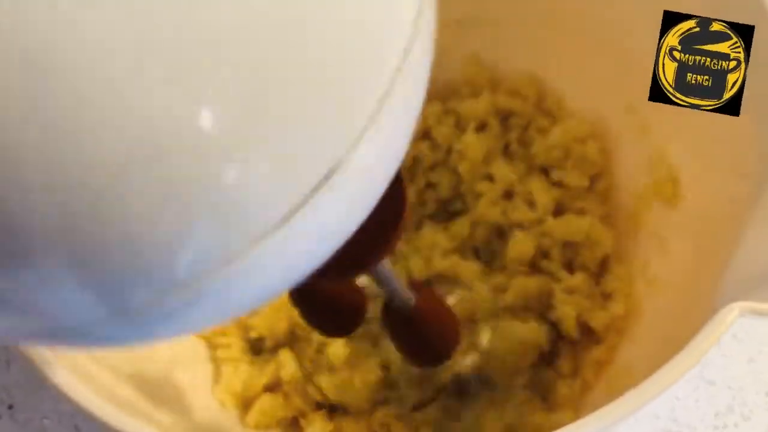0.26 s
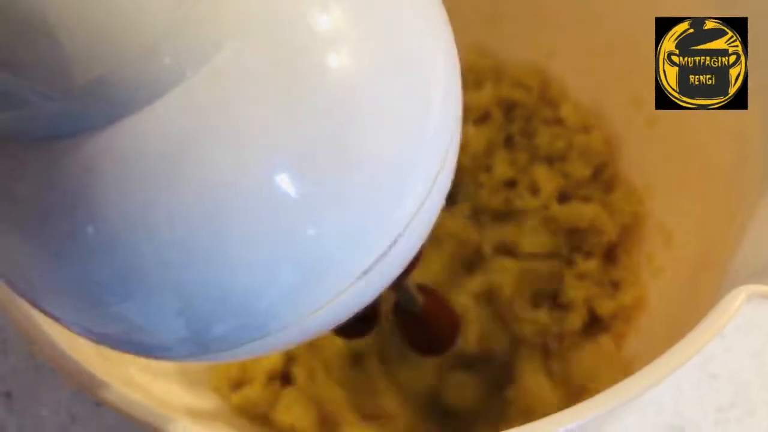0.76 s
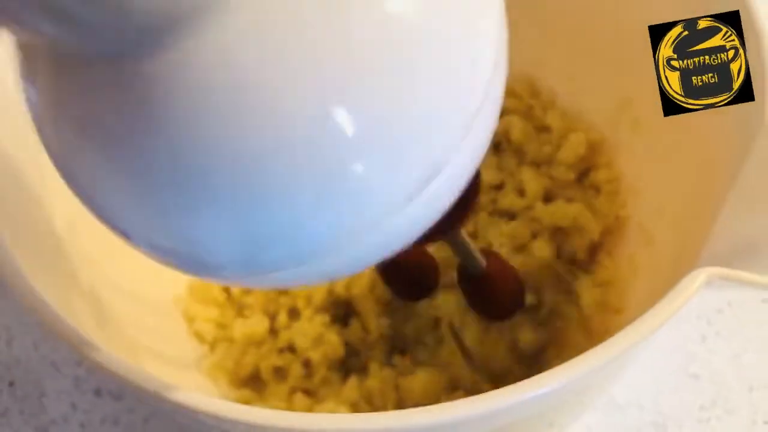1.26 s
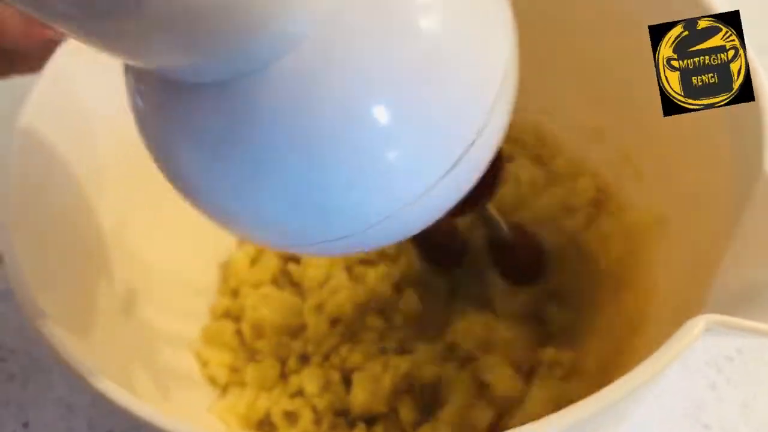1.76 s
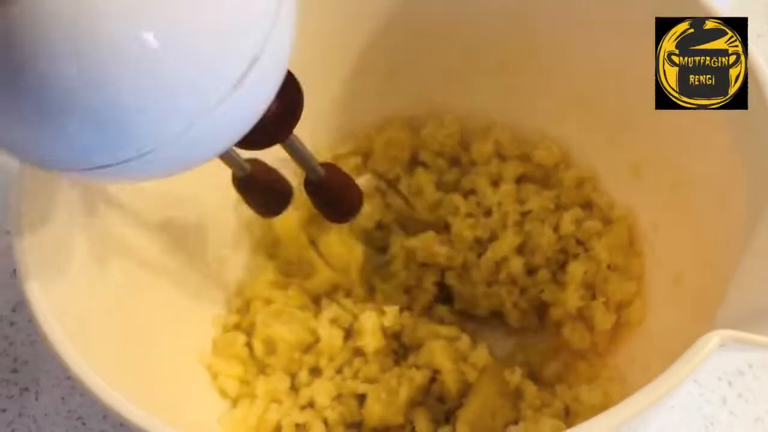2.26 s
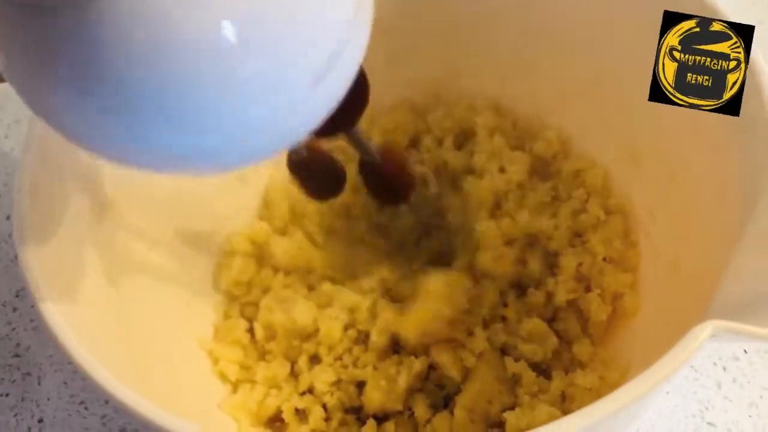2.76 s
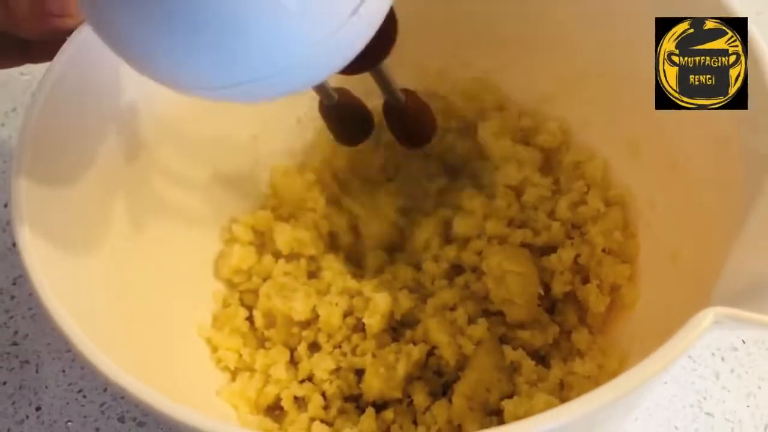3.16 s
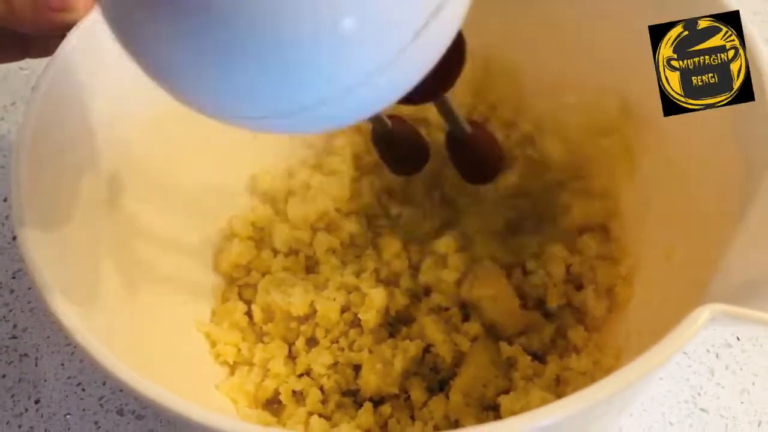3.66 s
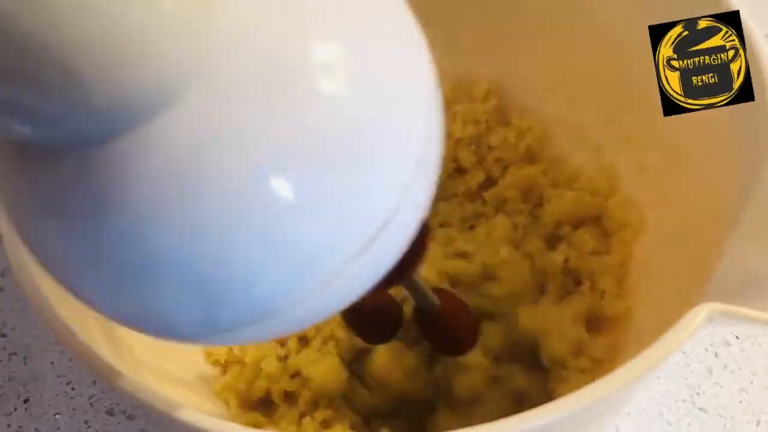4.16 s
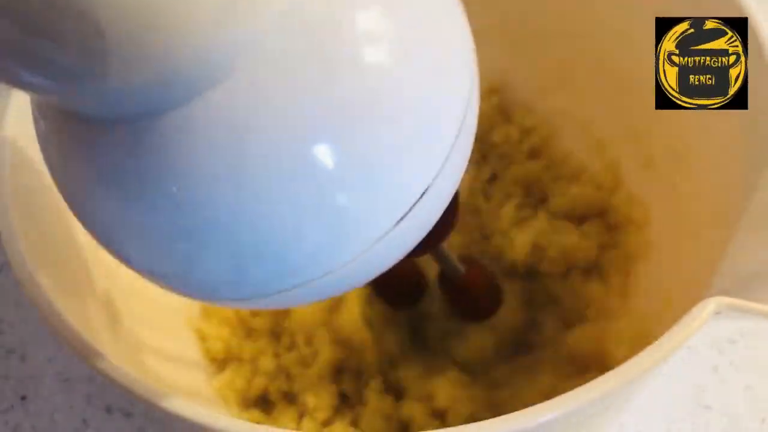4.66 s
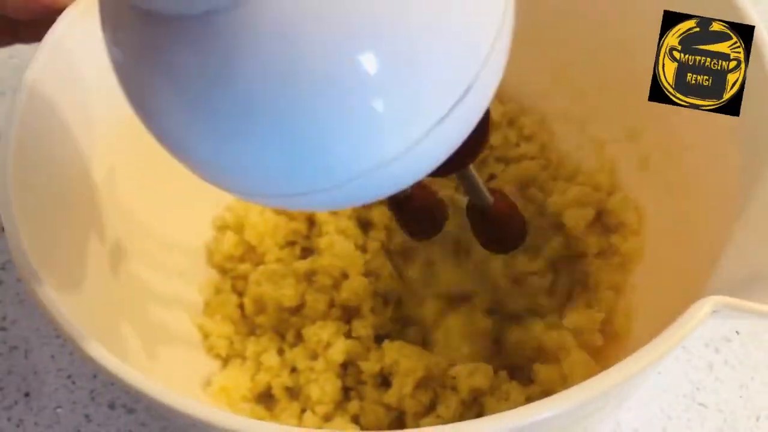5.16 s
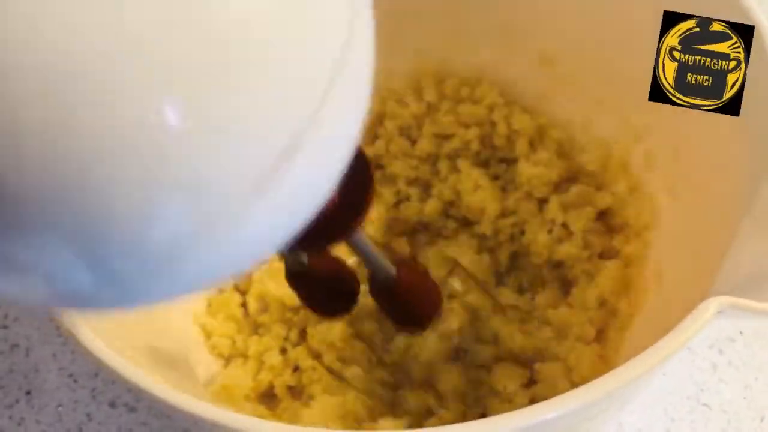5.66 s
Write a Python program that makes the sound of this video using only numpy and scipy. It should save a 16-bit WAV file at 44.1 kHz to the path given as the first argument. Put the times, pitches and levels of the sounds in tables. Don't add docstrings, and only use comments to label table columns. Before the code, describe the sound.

A mixer already spinning winds down, then revs again seven times, with short taps and longer bursts. Its bright brush hiss and buzzy whine rise fast and sink into rougher ticking as it slows. Hollow plastic knocks scatter around the bursts, thinning after three seconds and returning near 4.3 and 5.7. Dry, close single-microphone sound in a small kitchen, with low counter rumbles and slightly stepped, choppy pitch.

```python
import sys
import numpy as np
from scipy import signal
from scipy.fft import rfft, irfft
from scipy.io import wavfile
from scipy.ndimage import uniform_filter1d, map_coordinates

SR = 44100
rng = np.random.default_rng(int(sys.argv[2]) if len(sys.argv) > 2 else 0)


def gain_from_decibels(decibels):
    exponent = np.asarray(decibels, float) / 20
    return 10 ** exponent


def store_pcm(level_fs):
    pcm = np.round(np.clip(level_fs, -1, 1) * 32767).astype(np.int16)
    wavfile.write(sys.argv[1], SR, np.atleast_2d(pcm).T)


N = 260190

# [t/s, level/dB]
FAR_HUM = [(0, -48), (1.9, -52), (2.2, -64), (5.9, -89)]
FAR_HUM_HZ = 127
# [f/Hz, density/dB per Hz]
ROOM_TONE = [(59, -48), (100, -21), (135, -27), (193, -19), (645, 26.5), (1850, 20.5), (5310, -16),
             (9000, -43), (11700, -80), (19800, -120)]
ROOM_DB = -51.5
# [t/s, rumble level/dB]
SHOVES = [(0.02, -45), (.28, -46), (.52, -36), (.72, -43), (1.01, -36.5), (2.28, -45), (3.07, -47),
          (3.45, -72), (4.32, -38), (5.22, -63), (5.88, -36)]
SHOVE_RISE_DB_S, SHOVE_FALL_DB_S, RUMBLE_FLOOR_DB = 223, 90, -61

# [t/s, peak level/dB, crack rel/dB, dull thud rel/dB]
KNOCKS = [(0.092, -39, -3, 11), (0.186, -61, -10, 0), (0.493, -19.5, -3, 6), (0.594, -18, -15, 14.5),
          (0.805, -31, -10, -2), (0.977, -14, 3.5, 12), (1.02, -22, 0, 9), (1.065, -17, -16, 7),
          (1.191, -28, 13.5, -6), (1.498, -49.5, -8, 0), (1.547, -25, -13, 0), (2.071, -22.5, 4.5, 4),
          (2.105, -17, -15, 2), (2.186, -16, -3.5, -12), (2.238, -26.5, 8.5, 3), (2.316, -24.5, -21, 10),
          (2.963, -18.5, -6, 8), (2.996, -17, -10, 5), (3.052, -18, -2, 2), (3.09, -18.5, -9, 8),
          (4.254, -27.5, 2, 7), (4.294, -29, 12.5, 6), (4.348, -28, -1, 16), (5.665, -22, -3, 12),
          (5.818, -23.5, -17, 13)]
# [f/Hz, level/dB, t60/s]
BOWL_MODES = [(132, -28, 0.12), (215.6, -9.5, 0.079), (302, -17, 0.16), (566, 8.5, 0.1), (780, 3, 0.051),
              (1432, 5, 0.059)]

# [on t/s, off t/s, speed reached/turns per s, braking by dough/turns per s2]
PRESSES = [
    (-.3, 0.0, 120.5, 247),
    (.372, .6, 253, 266),
    (1.192, 1.538, 273.5, 244),
    (2.132, 2.422, 273, 239),
    (3.052, 3.342, 274, 253),
    (4.232, 4.4, 227, 254),
    (4.912, 5.078, 246.5, 251),
    (5.812, 6.1, 262, 250),
]
FREE_SPEED = 310
FAN_DRAG, DRY_DRAG, DRY_SPEED, CREEP_SPEED = .5, .6, 127, 12
PIECE_S, FIRST_S = .02, .014

# [f/Hz, density/dB per Hz]
CASING = [(59, -61), (100, -25), (306, -20.5), (602, -13.5), (759, -7), (978, -15), (1230, -7.5),
          (2690, -9), (3330, -5), (4970, -3.5), (7110, -7.5), (10200, -10.5), (15500, -9)]
# [f/Hz, width/Hz, level/dB]
SHELL = [(758, 1300, -6.5), (1398, 70, 4), (2032, 300, 4), (3190, 810, 4.5), (4126, 400, 4.5),
         (4994, 980, 4.5), (5714, 710, 4.5), (9930, 900, 7.5)]
# [f/Hz, level/dB]
BRUSH_RING = [(100, -2), (2000, -2), (3300, -5), (4300, 2), (5700, 4), (6500, -3), (8300, -9), (10300, -1),
              (12500, -8)]
COILS, MAINS_HZ = 14, 50
ROTOR_DB = [9, 4.5, -5, -8.5, -3.5, 4.5, -33, -0.5, -16, -11, -1.5, 4.5, 7, -2, 5.5, 2, 1.5, -0.5]
ROTOR_HUM_DB = -18
TICKS_DB = [-3, 1, 0, 0, 0, -1, -1, -2, -2, -3, -3, -4, -4]
COIL_SPEED, COIL_RISE_DB = 235, 5
SETTLE_SPEED, FREE_HUM_LOSS_DB = 160, 4

# [speed/turns per s, casing 2.5-7 kHz level/dB, low register level/dB, high rel/dB]
POWERED = [(60, -36.5, -35.5, -5), (96.4, -28.5, -23.5, -0.5), (117, -20.5, -24.5, -6),
           (154.5, -16.5, -22.5, -2.5), (214, -13.5, -28, -3), (230, -15, -26, 1), (252, -16, -28.5, 1.5),
           (279, -15, -26.5, -2)]
# [speed/turns per s, casing 2.5-7 kHz level/dB, low register level/dB, high rel/dB]
COASTING = [(1, -67, -54.5, -18), (20.1, -55, -43, 1), (52.5, -36, -33.5, -7), (83.5, -23.5, -27.5, -7.5),
            (128, -18.5, -28.5, -10.5), (148, -18.5, -28.5, -7.5), (200, -14.5, -24.5, -5),
            (233, -15.5, -27.5, -2), (279, -13.5, -24, -0.5)]
# [speed/turns per s, whine level/dB, ticks level/dB]
POWERED_TONES = [(90, -8, -8), (160, -4, -4), (200, 0, -6), (255, 0, -6), (275, -4, -2)]
# [speed/turns per s, whine level/dB, ticks level/dB]
COASTING_TONES = [(45, -11, -20), (68, -7, -8), (100, -6, -10), (125, -4, -16), (160, -8, -20),
                  (185, -8, -16), (235, -5, -7), (275, -3, -2)]
# [low register under current/dB, low coasting/dB, ticks at speed/dB]
SEATING = [(0, 4.5, 0), (2, 3.5, 0), (-0.5, -4.5, -3), (-2, -1.5, 0), (1, 0, -8), (0, -0.5, -1),
           (0, 1.5, -1), (2.5, 1, -1)]
# [from/turns per s, down to/turns per s, whine loss/dB, slow ticks/dB]
BOUNCING = [(0, 0, 0, -1), (178, 132, 12, 0), (240, 125, 11, -5), (290, 152, 14, -5), (280, 185, 8, -1),
            (175, 100, 2, -10), (190, 135, 3, -1), (0, 0, 0, -4)]
# [t/s, level/dB]
FACING = [(0, 1), (.72, 1), (.82, -3), (.96, 1), (1.6, 0), (1.82, 1.5), (1.88, -3), (2.45, -0.5), (2.7, -9),
          (2.84, -2), (3.5, -0.5), (3.8, 2), (4.62, 1.5), (4.68, -1), (4.95, 2.5), (5.35, 0), (5.62, 5.5),
          (5.83, 0.5)]
LOW_FOLLOWS, HIGH_FOLLOWS = 0.27, 1.46


def rms_one(x):
    return x / np.sqrt(np.mean(x ** 2) + 1e-20)


def in_time(rows, clock):
    s, *columns = np.transpose(rows)
    return [np.interp(clock, s, c) for c in columns]


def colour(x, spectrum, peaks=()):
    hz = np.maximum(np.fft.rfftfreq(len(x), 1 / SR), 1)
    points = np.array(spectrum)
    db = np.interp(np.log(hz), np.log(points[:, 0]), points[:, 1])
    for top_hz, width_hz, top_db in peaks:
        db = db + top_db / (1 + ((hz - top_hz) / width_hz * 2) ** 2)
    return irfft(rfft(x) * gain_from_decibels(db), len(x))


def band(x, low_hz, high_hz):
    return signal.sosfilt(signal.butter(3, [low_hz, high_hz], "band", fs=SR, output="sos"), x)


def wobble(hz):
    r = np.exp(-2 * np.pi * hz / SR)
    return rms_one(signal.lfilter([1], [1, -2 * r, r * r], rng.standard_normal(N + 4000))[4000:])


def kitchen():
    t = np.arange(N) / SR
    shoves = np.zeros(N)
    for s, db in SHOVES:
        shoves += gain_from_decibels(db - np.where(t < s, SHOVE_RISE_DB_S * (s - t), SHOVE_FALL_DB_S * (t - s)))
    counter = band(rng.standard_normal(N), 42, 66) + .5 * band(rng.standard_normal(N), 85, 125)
    rumble = (gain_from_decibels(RUMBLE_FLOOR_DB) + shoves) * rms_one(counter)
    hum = gain_from_decibels(in_time(FAR_HUM, t)[0] + 0.66 * wobble(2.7)) * np.sin(2 * np.pi * FAR_HUM_HZ * t)
    room = gain_from_decibels(ROOM_DB) * rms_one(colour(rng.standard_normal(N), ROOM_TONE))
    return rumble + hum + room


def knocks():
    s, peak_db, crack_db, thud_db = np.transpose(KNOCKS)
    at = np.round(s * SR).astype(int)
    ringing = np.zeros(N)
    spread_db = rng.normal(0, 0.29, (len(at), len(BOWL_MODES)))
    for k, (hz, level_db, t60) in enumerate(BOWL_MODES):
        clicks = np.full(N, 1e-18)
        clicks[at] = gain_from_decibels(peak_db + level_db - 14.5 + spread_db[:, k] + thud_db * (k < 3))
        r, w = gain_from_decibels(-60 / (t60 * SR)), 2 * np.pi * hz / SR
        ringing += signal.lfilter([0, np.sin(w)], [1, -2 * r * np.cos(w), r * r], clicks)
    clicks = np.full(N, 1e-18)
    clicks[at] = gain_from_decibels(peak_db + crack_db)
    dying = signal.lfilter([1], [1, -gain_from_decibels(-60 / (0.12 * SR))], clicks)
    crack = dying * rng.standard_normal(N)
    return band(ringing, 150, 9000) + band(crack, 195, 7400)


def splices(creep, piece_db):
    t = np.arange(N) / SR
    piece = np.floor((t - FIRST_S) / PIECE_S).astype(int) + 1
    middle = (piece - .5) * PIECE_S + FIRST_S
    clock = uniform_filter1d(middle + creep * (t - middle), size=90)
    draws = rng.standard_normal((piece.max() + 1, 3))
    return clock, gain_from_decibels(piece_db * uniform_filter1d(draws[piece].T, size=90))


def rotor(clock):
    grid = np.arange(.5, 300, .5)
    climb = np.cumsum(grid / (FREE_SPEED - grid))
    braking = 1 + FAN_DRAG * (grid / 250) ** 7 + DRY_DRAG * np.exp(-grid / DRY_SPEED)
    run_down = np.cumsum(.5 / (braking * np.tanh(grid / CREEP_SPEED)))
    on, off, top, load = np.transpose(PRESSES)
    press = np.searchsorted(on, clock) - 1
    per_s, start = np.zeros(N), 1
    for k, end in enumerate(np.r_[on[1:], np.inf]):
        s = np.r_[clock[press == k], end]
        climbed = np.interp(s, [on[k], off[k]], np.interp([start, top[k]], grid, climb))
        rising = np.interp(climbed, climb, grid)
        left = np.interp(top[k], grid, run_down) - load[k] * (s - off[k])
        falling = np.interp(left, run_down, grid)
        per_s[press == k] = np.where(s < off[k], rising, falling)[:-1]
        start = falling[-1]
    current = 1. * (clock < off[press])
    return per_s, current, press


def partials(turn, per_s, orders, levels_db, flutter_db, flutter_hz, blur):
    out = np.zeros(N)
    flutter = wobble(flutter_hz)
    for order, level_db in zip(orders, levels_db):
        gain = gain_from_decibels(level_db + flutter_db * np.roll(flutter, rng.integers(N)))
        phase = order * turn + rng.uniform(0, 2 * np.pi) + blur * np.roll(flutter, rng.integers(N))
        out += gain * (order * per_s < 17000) * np.sin(phase)
    return out


def rotor_hum(turn, per_s, powered):
    free_loss_db = FREE_HUM_LOSS_DB * (1 - powered) * (per_s > SETTLE_SPEED)
    tones = partials(turn, per_s, np.arange(1, 19), ROTOR_DB, flutter_db=3.5, flutter_hz=22, blur=.7)
    return gain_from_decibels(ROTOR_HUM_DB - free_loss_db) * tones


def scored_surface(turn):
    turns = turn / (2 * np.pi)
    scratches = rng.standard_normal((400, 128))
    place = [turns / 3.5, turns % 1 * 128]
    return rms_one(map_coordinates(scratches, place, order=1, mode="grid-wrap"))


def brush_hiss(turn, per_s, mains, drag):
    sparks = (rng.random(N) < 500 / SR) * rng.normal(0, 2.14, N) * np.clip(per_s / 200, 0, 1)
    rubbing = rng.standard_normal(N) + 0.27 * scored_surface(turn) + sparks
    return rubbing * mains * (1 + (0.21 + drag) * np.sin(turn)) * gain_from_decibels(0.49 * wobble(220))


def brush_ticks(turn, per_s, level_db, fast_db, crawl_db, blur):
    slow_db = np.clip((130 - per_s) / 15, 0, 6)
    seat_db = np.where(per_s > SETTLE_SPEED, fast_db, crawl_db)
    coil_db = TICKS_DB[0] + (COIL_RISE_DB - fast_db) * np.clip((per_s - COIL_SPEED) / 20, 0, 1)
    tones = partials(turn, per_s, COILS * np.r_[1, 3:15], [coil_db, *TICKS_DB[1:]],
                     flutter_db=2.0, flutter_hz=50, blur=blur - .25 + per_s / 600)
    return gain_from_decibels(level_db + slow_db + seat_db) * tones


def bar_whine(turn, per_s, level_db, blur):
    shaken = turn + .05 * np.clip(per_s / 270, 0, 1) ** 4 * np.sin(turn)
    tone = partials(shaken, per_s, [2 * COILS], [0], flutter_db=2.5, flutter_hz=90, blur=blur)
    return gain_from_decibels(level_db) * tone


def registers(shell, levels_db, piece_gain):
    low, mid = band(shell, 170, 2500), band(shell, 2375, 7520)
    high = band(shell, 6600, 12280) * gain_from_decibels(1.66 * wobble(130))
    probes = band(low, 700, 5100), mid, high
    out = np.zeros(N)
    for part, probe, db, gain in zip((low, -mid, high), probes, levels_db, piece_gain):
        running_rms = np.sqrt(uniform_filter1d(probe ** 2, size=3500))
        out += part / running_rms * gain_from_decibels(db) * (gain * piece_gain[1]) ** .5
    return out


def motor():
    clock, piece_gain = splices(creep=.22, piece_db=1.5)
    per_s, current, press = rotor(clock)
    powered = uniform_filter1d(current, size=400)
    turn = 2 * np.pi * np.cumsum(per_s * piece_gain[0] ** (.012 + .03 * powered)) / SR

    driven_db, free_db, fast_db = np.transpose(SEATING)[:, press]
    upper, lower, loss_db, crawl_db = np.transpose(BOUNCING)[:, press]
    bouncing = (1 - current) * np.clip(np.minimum(upper - per_s, per_s - lower) / 10, 0, 1)
    under_current = in_time(POWERED, per_s) + in_time(POWERED_TONES, per_s)
    coasting = in_time(COASTING, per_s) + in_time(COASTING_TONES, per_s)
    laws = np.where(current, under_current, coasting)
    mid_db, low_db, high_db, whine_db, tick_db = uniform_filter1d(laws, size=60)

    drag = .1 * np.exp(-((per_s - 55) / 20) ** 2)
    mains = 1 + 0.17 * powered * np.sin(4 * np.pi * MAINS_HZ * np.arange(N) / SR)
    once = (.3 + .12 * powered + drag) * np.sin(turn)
    twice = (.15 + .1 * powered) * np.sin(2 * turn + 1)
    lumpy = mains * (1 + once + twice)

    blur = .65 + .4 * powered
    whine = bar_whine(turn, per_s, whine_db - loss_db * bouncing, blur)
    ticks = brush_ticks(turn, per_s, tick_db, fast_db, crawl_db, blur)
    hum = rotor_hum(turn, per_s, powered)
    hiss = brush_hiss(turn, per_s, mains, drag)
    shell = colour(hiss + colour(lumpy * (whine + ticks), BRUSH_RING) + hum, CASING, SHELL)

    facing_db, = in_time(FACING, clock)
    levels_db = (low_db + np.where(current, driven_db, free_db) + LOW_FOLLOWS * facing_db,
                 mid_db + facing_db,
                 mid_db + high_db + HIGH_FOLLOWS * facing_db)
    return registers(shell, levels_db, piece_gain)


def scene():
    return (kitchen() + knocks() + motor())[None]


def roll_off(x):
    return signal.sosfilt(signal.butter(12, 15680, fs=SR, output="sos"), x)


def record(dry):
    top = .83
    rounding = top * np.tanh(dry[0] / top) - dry[0]
    shaved = colour(rounding, [(250, -30), (700, 0)])
    return roll_off(dry + shaved)


dry = scene()
out = record(dry)
store_pcm(out)
```